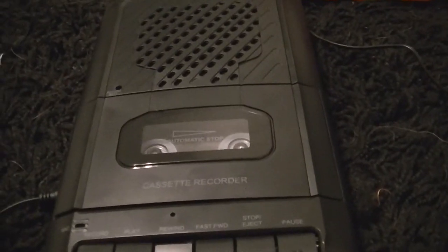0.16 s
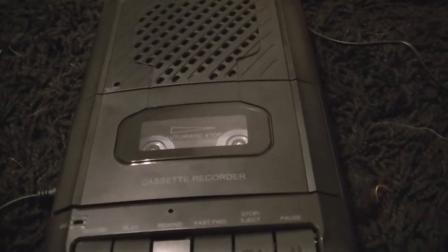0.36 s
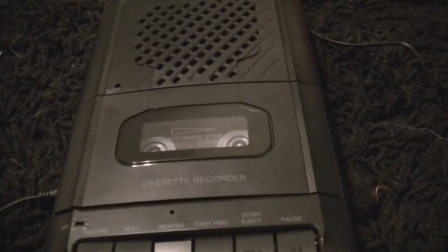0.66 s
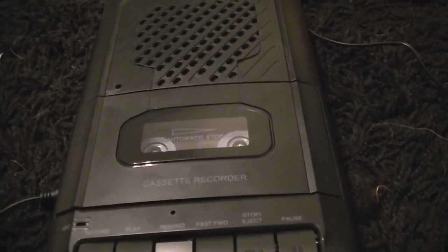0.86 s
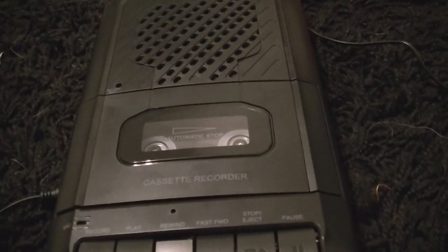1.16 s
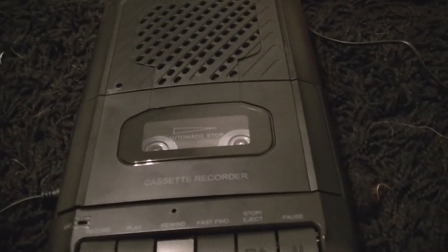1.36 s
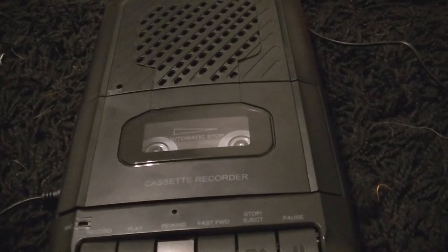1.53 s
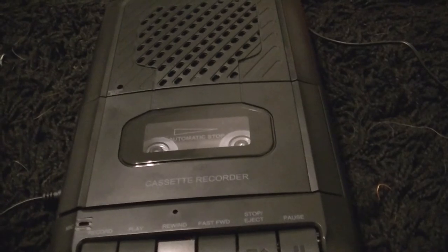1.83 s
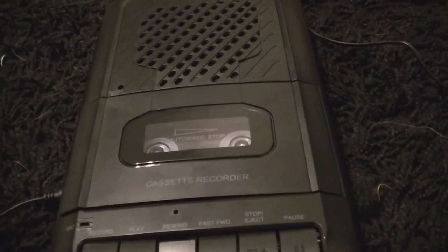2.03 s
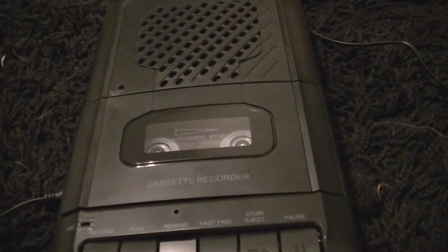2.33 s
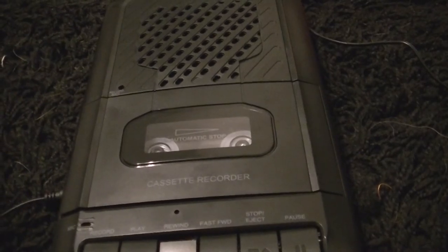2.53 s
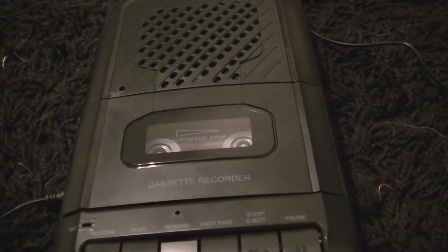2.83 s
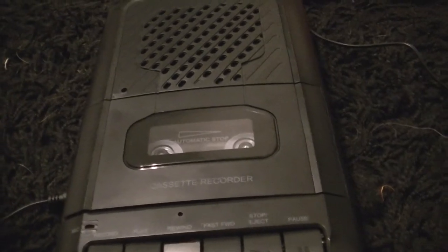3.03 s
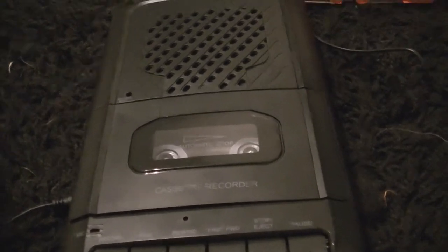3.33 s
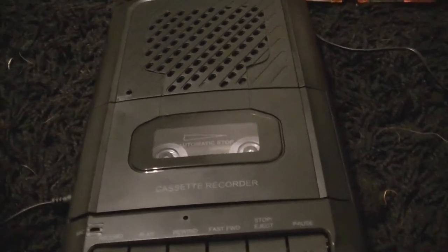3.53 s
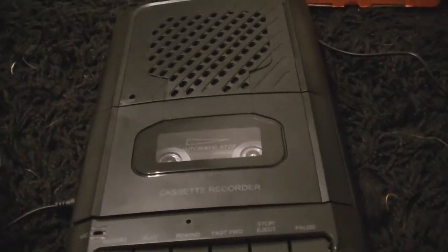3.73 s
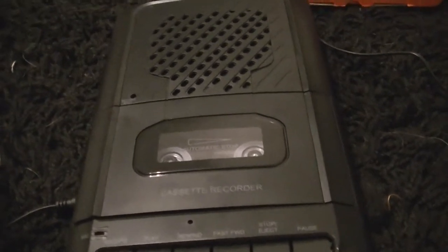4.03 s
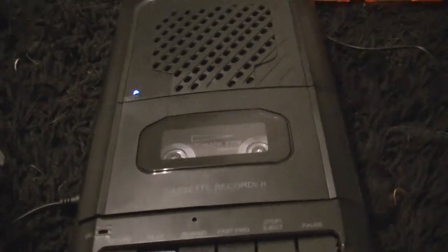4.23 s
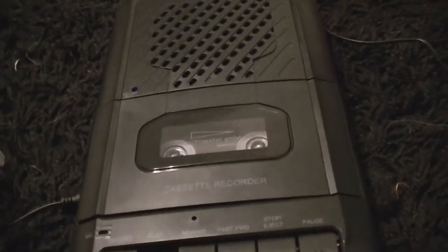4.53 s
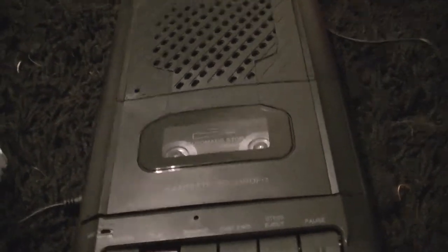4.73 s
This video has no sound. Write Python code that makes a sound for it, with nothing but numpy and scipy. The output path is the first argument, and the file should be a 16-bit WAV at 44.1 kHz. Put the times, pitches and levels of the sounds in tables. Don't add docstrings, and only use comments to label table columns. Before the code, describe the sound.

Tape rewinding inside a hollow plastic case, heard very near: fluttering mechanical chatter, midrange whirr, bright loose rattles, no bass. The tape runs out and the motor stalls, straining faintly. The rewind key springs back with one sharp metallic spike and short buzz, then fingers slide and click other keys, ending in slow motor hiss and thin whistle. Soft room air, short echoes.

```python
import sys
import numpy as np
from scipy import signal
from scipy.fft import rfft, irfft, next_fast_len
from scipy.io import wavfile

SR = 44100
rng = np.random.default_rng(int(sys.argv[2]) if len(sys.argv) > 2 else 0)


def wav_out(sig):
    wavfile.write(sys.argv[1], SR, np.round(np.clip(np.atleast_2d(sig).T, -1, 1) * 32767).astype(np.int16))


def how_loud(loudness_db):
    steps = np.asarray(loudness_db, float) / 20
    return 10 ** steps


N = 215230
TIME_S = np.arange(N) / SR

# pitch_hz, level_db (per Hz)
AIR_COLOUR = [(15, -81.5), (25, -44), (150, -16), (167, -10.5), (245, -7.5), (280, -2.5), (378, -2),
              (669, -6), (854, -1), (1280, -8.5), (1730, -4.5), (3700, -14), (15200, -30), (16500, -51.5)]
AIR_DB = -61
HUM_HZ, HUM_DB = 180.7, -82.5
# start_s, peak_db
HAND_BUMPS = [
    (0.131, -55),
    (0.177, -56),
]
JOLT_DB = -56
# pitch_hz, t60_s
ROOM_DECAY = [(500, 0.38), (2000, 0.39), (6000, 0.2), (14000, 0.054)]
ROOM_DB = -20
# pitch_hz, side_minus_mid_db
SIDE_COLOUR = [(60, -9), (200, -22), (380, -22.5), (700, -23.5), (1290, -36.5), (2380, -28), (4400, -20.5),
               (8120, -28.5), (15000, -24)]
KEYS_SIDE_DB = 1.5
STEADY_TOP_HZ = 15750

# time_s, level_db
STRAIN_LEVEL = [(2.8, -68.5), (3.14, -64)]
# time_s, level_db
PLAY_HISS_LEVEL = [(4.3, -80), (4.45, -68), (4.79, -66), (4.82, -68), (4.88, -70)]
# pitch_hz, width_hz, level_db
STRAIN_MODES = [(1100, 570, 0), (3100, 950, -0.5), (9900, 350, -13), (13500, 400, -14.5)]
# pitch_hz, width_hz, level_db
PLAY_MODES = [(1000, 1000, 1), (3675, 280, 7.5), (6610, 1050, -2.5), (7470, 160, -18.5)]
# time_s, level_db, pitch_hz
PLAY_WHISTLE = [(4.28, -80, 9900), (4.33, -74.5, 9800), (4.46, -68, 10400), (4.78, -68, 10250),
                (4.81, -61.5, 10100), (4.88, -66, 10100)]
LEADER_DB, LEADER_DB_PER_S, LEADER_HZ = -59, 5, 8500

# start_s, dull_snap_db, bright_snap_db, case_thump_db, ring_t60_s
SNAP_KEYS = [
    (2.7669, -31, -38.5, -41.5, 0.044),
    (2.7927, -44, -55, -49, 0.038),
    (3.3791, -40.5, -43, -57, 0.031),
    (3.5872, -59, -79, -68, 0.021),
    (4.155, -47, -52, -57, 0.013),
    (4.2071, -40.5, -47.5, -62, 0.023),
    (4.31, -50, -61, -59, 0.0235),
    (4.415, -28.5, -31.5, -43.5, 0.032),
    (4.799, -68, -80, -43, 0.012),
]
LATCH_SNAPS = [
    (3.198, -25, -25, -48.5, 0.044),
    (3.2048, -20.5, -16.5, -28.5, 0.026),
]
SPRING_BUZZES = [
    (3.158, -32, -38.5, -45, 0.2),
    (3.212, -42, -50, -52.5, 0.074),
]
# start_s, dull_snap_db, bright_snap_db, case_thump_db, scrape_in_s
SLIDE_KEYS = [
    (3.057, -58, -56, -55.5, 0.0099),
    (3.374, -55, -43.5, -66, 0.0032),
    (4.135, -60.5, -82.5, -60, 0.0026),
    (4.242, -46, -75, -54, 0.00275),
    (4.2484, -34.5, -41.5, -41, 0.0053),
    (4.405, -69.5, -52.5, -42, 0.0095),
    (4.79, -62.5, -55.5, -53.5, 0.005),
]
FINGER_RUBS = [
    (3.932, -64, -68, -56, 0.0046),
    (4.19, -51, -59, -55, 0.0051),
]
REWIND_KEY_SLIPS = [
    (3.115, -54, -66, -55, .002),
    (3.133, -50, -58, -49, .001),
    (3.1457, -28, -30, -40, .0006),
    (3.1497, -20, -20, -32, .0005),
]
# pitch_hz, level_db (per Hz)
SNAP_COLOUR = [(880, -48), (1500, -4), (2340, -6), (3050, -4), (3510, -4.5), (3880, -3.5), (4470, -4.5),
               (9170, -7.5), (15200, -17.5), (16800, -45.5)]
# pitch_hz, width_hz, level_db
CASE_MODES = [(546.5, 70, -4), (735, 96, 2.5), (930, 46, 2.5), (1011, 110, -0.5), (1233, 80, -2.5),
              (1420, 51, -2), (1280, 400, -7.5), (1980, 130, -7)]
SNAP_RISE_S, LATCH_RISE_S, SPRING_RISE_S = 0.0016, 0.0019, 0.01
SLIDE_T60_S, RUB_T60_S, SLIP_T60_S = 0.025, 0.18, 0.035
SPIKE_S, SPIKE_DB = 3.1488, -4
PAWL_S, PAWL_DB = 4.4712, -39

# time_s, turns_done
SHAFT_TURNS = [(0, .49), (.8, 34.33), (1.2, 51.32), (2, 85.4), (2.4, 102.58), (2.8, 120.1)]
# place_turns, level_db, scatter_db, slack_share (how much it follows HUB_SLACK)
SHAFT_CONTACTS = [
    (0, 6.5, 2.5, -0.076),
    (.3, -0.5, 7, 0.92),
    (.62, -15, 2.5, -0.026),
]
WHEEL_BEATS = [(.381, -.04), (.382, -.12), (.208, -.05)]
WHEEL_SWING_DB = [0.2, 4, 4.5]
# time_s, slack_db
HUB_SLACK = [(0, -16), (.5, -6), (.8, 2), (1.4, -1), (2, 5), (2.4, 3), (2.76, 1.5)]
TAPE_END_S, COAST_T60_S = 2.768, 0.14
# pitch_hz, width_hz, level_db
CHASSIS_MODES = [(2004, 740, -16), (3226, 400, -17), (3633, 150, -3), (3930, 390, -13), (4620, 360, -13),
                 (5196, 340, -11.5), (6250, 450, -12.5), (6910, 580, -13.5), (7470, 520, -14.5),
                 (9340, 1770, -16), (10600, 1800, -17.5), (11990, 1200, -25), (13600, 2000, -28),
                 (15900, 1000, -28)]
# start_s, peak_db
HUB_RATTLES = [(0.603, -30), (0.65, -37), (0.6816, -26), (0.7453, -50), (0.8697, -37), (1.0127, -33),
               (1.058, -30.5), (1.1294, -30), (1.171, -39), (1.215, -30), (1.292, -29), (1.4325, -33),
               (1.4814, -30), (1.5984, -25), (1.6225, -28.5), (1.6694, -38), (1.715, -25.5), (1.8562, -34),
               (1.8794, -30.5), (1.9272, -30.5), (1.95, -27.5), (1.973, -29), (1.997, -30.5),
               (2.044, -27.5), (2.068, -30.5), (2.1833, -27.5), (2.393, -27), (2.415, -35), (2.6126, -32),
               (2.686, -34.5)]
# pitch_hz, level_db (per Hz)
RATTLE_COLOUR = [(3000, -40), (4600, 0), (5300, -5.5), (7400, -10), (8250, -11), (9400, 0), (11200, -10.5),
                 (11900, -12), (15500, -25), (16500, -7.5)]
# start_s, peak_db, pitch_hz
FLANGE_TICKS = [(0.027, -32, 6180), (0.1216, -36, 5100), (0.145, -29, 5370), (0.2636, -26, 6400),
                (0.349, -28, 5240), (0.7806, -23, 5260), (1.039, -27, 5320), (1.18, -27, 5240),
                (1.3443, -24.5, 5160), (1.6432, -25, 5280), (1.8332, -22.5, 6160), (1.9515, -25, 6250),
                (1.9739, -45, 6340), (2.0921, -26, 5260), (2.2064, -24, 6840), (2.255, -22.5, 6230),
                (2.3705, -31, 6230)]
FLANGE_HZ = [5420, 6250, 6900]
# pitch_hz, width_hz, level_db
GEAR_MODES = [(607, 39, -14), (967.6, 50, -9), (1004.6, 48, -9.5), (1232, 120, -12.5), (1802, 17, -10.5),
              (2010, 390, -28.5), (3488, 630, -19.5)]
# pitch_hz, level_db (per Hz)
WHIRR_COLOUR = [(240, -58), (400, -21), (986, 5), (2890, -10.5), (3590, 5), (4190, -38), (5300, 10.5),
                (11200, -35), (15300, -32.5), (16500, -39.5)]
KNOCK_DB, WHIRR_DB, MESH_TEETH = -49.5, -56.5, 23
RUB_DB, RUB_RISE_FROM_S, RUB_RISE_DB_PER_S = -13, 1.9, 7
RATTLE_TREBLE_DB, TREBLE_FOLLOWS = -44, 0.52
LIGHT_RATTLE_DB, LIGHT_SCATTER_DB = -45.5, 5
TICK_DB, TICK_SCATTER_DB, TICK_TREBLE_DB = -40, 6, -9.5


def noise():
    return rng.standard_normal(N)


def rms_one(x):
    return x / np.sqrt(np.mean(x ** 2) + 1e-20)


def butter(x, order, hz, kind="low"):
    return signal.sosfilt(signal.butter(order, hz, kind, fs=SR, output="sos"), x)


def in_time(rows, outside=None):
    s, *columns = np.transpose(rows)
    return [np.interp(TIME_S, s, column, outside, outside) for column in columns]


def shade(x, spectrum):
    size = 4096
    hz, db = np.transpose(spectrum)
    bins_hz = np.arange(size // 2 + 1) * SR / size
    curve_db = np.interp(np.log(bins_hz + 1), np.log(hz), db)
    cepstrum = irfft(np.log(how_loud(curve_db)))
    cepstrum[1:size // 2] *= 2
    cepstrum[size // 2 + 1:] = 0
    response = irfft(np.exp(rfft(cepstrum)))
    return signal.fftconvolve(x, response)[:len(x)]


def resonate(x, peaks):
    out = 0
    for k, (hz, width_hz, db) in enumerate(peaks):
        r = np.exp(-np.pi * width_hz / SR)
        top = [(1 - r * r) / 2, 0, (r * r - 1) / 2]
        bottom = [1, -2 * r * np.cos(2 * np.pi * hz / SR), r * r]
        out = out + (-1) ** k * how_loud(db) * signal.lfilter(top, bottom, x + 1e-18)
    return out


def humps(peaks):
    hz = np.geomspace(200, 20000, 900)
    power = sum(how_loud(2 * db) / (1 + (2 * (hz - f) / width_hz) ** 2) ** 2 for f, width_hz, db in peaks)
    return np.transpose([hz, 10 * np.log10(power)])


def swells(times, dbs, t60s, rises):
    shape, t = np.zeros(N), np.arange(8000) / SR
    for s, db, t60, rise in np.broadcast(times, dbs, t60s, rises):
        start, rise = round(s * SR), max(rise, 1e-4)
        fall = how_loud(db - 60 * np.maximum(t - rise, 0) / max(t60, .003))
        one = fall * np.sin(np.pi / 2 * np.minimum(t / rise, 1)) ** 2
        shape[start:start + len(t)] += one[:N - start]
    return shape


def bursts(times, dbs, t60s, rises):
    return swells(times, dbs, t60s, rises) * noise()


def flicker(rate_hz, depth_db):
    r = np.exp(-2 * np.pi * rate_hz / SR)
    slow = signal.lfilter([1], [1, -2 * r, r * r], rng.standard_normal(N + SR))[SR:]
    return how_loud(depth_db * rms_one(slow))


def tone(hz):
    return np.sin(2 * np.pi * np.cumsum(hz * np.ones(N)) / SR)


def room_air():
    return how_loud(AIR_DB) * rms_one(shade(noise(), AIR_COLOUR))


def microphone_body():
    s, db = np.transpose(HAND_BUMPS)
    hits = bursts(s, db + 27, 0.017, 0.0032)
    bumps = resonate(resonate(hits, [(260, 160, 0)]), [(260, 210, 0)])
    jolt = swells(SPIKE_S, JOLT_DB, 0.0059, 0.0012)
    hum = how_loud(HUM_DB) * np.sqrt(2) * flicker(6.2, 2.9) * np.sin(2 * np.pi * HUM_HZ * TIME_S)
    return bumps + jolt + hum


def room(x):
    t, tail = np.arange(SR // 2) / SR, 0
    for hz, t60 in ROOM_DECAY:
        band = resonate(rng.standard_normal(len(t)), [(hz, 1.5 * hz, 0)])
        tail = tail + band * how_loud(-60 * t / t60) * np.minimum(t / 0.03, 1)
    return signal.fftconvolve(x, tail / np.sqrt(np.sum(tail ** 2)))[:N]


def slow_motor(curve, peaks, lift_db):
    level_db = in_time(curve, outside=-140)[0]
    return how_loud(level_db + lift_db) * flicker(30, 0.55) * rms_one(resonate(noise(), peaks))


def capstan():
    rough = rms_one(butter(noise(), 2, 260)) * flicker(15, 0.92)
    level_db = in_time(PLAY_WHISTLE, outside=-140)[0]
    pitch_hz = in_time(PLAY_WHISTLE)[1]
    return how_loud(level_db + 0.5) * rough * tone(pitch_hz)


def coasting():
    return how_loud(-60 * np.maximum(TIME_S - TAPE_END_S, 0) / COAST_T60_S)


def leader():
    growth_db = LEADER_DB_PER_S * np.minimum(TIME_S - TAPE_END_S, 0)
    hiss = butter(noise(), 2, LEADER_HZ, "high")
    return how_loud(LEADER_DB + growth_db) * coasting() * flicker(40, 2.1) * hiss


def strike(s, dull_db, bright_db, thump_db, t60, rise, top_hz):
    dull = butter(shade(bursts(s, dull_db + 9.5, t60, rise), SNAP_COLOUR), 3, 4800)
    bright = shade(bursts(s, bright_db + 14.0, 0.68 * t60, rise), SNAP_COLOUR)
    bright = butter(bright, 2, [4800, top_hz], "band")
    push = bursts(s, thump_db + 18.5, 1.74 * t60, rise)
    knock = np.gradient(swells(s + rise / 2, thump_db + 42, 0.0039, 0.00016))
    return dull + bright + resonate(push + knock, CASE_MODES)


def latch_spike():
    ring = .2 * tone(2900) + .8 * tone(6000) + tone(8800) + .8 * tone(10100) + .3 * tone(13800)
    return swells(SPIKE_S, SPIKE_DB, .0015, .0008) * ring


def pawl():
    return swells(PAWL_S, PAWL_DB, 0.0053, 0.00045) * (tone(1900) + tone(3000))


def keys():
    out = latch_spike() + pawl()
    snapping = [(SNAP_KEYS, SNAP_RISE_S, 12500), (LATCH_SNAPS, LATCH_RISE_S, 15900),
                (SPRING_BUZZES, SPRING_RISE_S, 9500)]
    for rows, rise, top_hz in snapping:
        out += strike(*np.transpose(rows), rise, top_hz)
    sliding = [(SLIDE_KEYS, SLIDE_T60_S, 12500), (FINGER_RUBS, RUB_T60_S, 12500),
               (REWIND_KEY_SLIPS, SLIP_T60_S, 15900)]
    for rows, t60, top_hz in sliding:
        s, dull_db, bright_db, thump_db, rise = np.transpose(rows)
        out += strike(s, dull_db, bright_db, thump_db, t60, rise, top_hz)
    return out


def touches(index, scatter_db):
    shaft_s, turns = np.transpose(SHAFT_TURNS)
    place, _, _, follows = SHAFT_CONTACTS[index]
    ratio, phase = WHEEL_BEATS[index]
    turn = np.arange(1, 119)
    luck = np.clip(rng.standard_normal((118, 2)), -2.5, 1.3)
    times = np.interp(turn + place + .03 * luck[:, 0], turns, shaft_s)
    slack_db = follows * np.interp(times, *np.transpose(HUB_SLACK))
    beat_db = WHEEL_SWING_DB[index] * np.cos(2 * np.pi * (ratio * turn + phase))
    return times, slack_db + beat_db + scatter_db * luck[:, 1]


def hub_rattles():
    light_s, light_db = touches(index=1, scatter_db=LIGHT_SCATTER_DB)
    s, db = np.transpose(HUB_RATTLES)
    plate = swells(s - .0015, db - 4.5, 0.011, 0.006)
    plate += swells(light_s - .002, LIGHT_RATTLE_DB + light_db, 0.0079, 0.00291)
    ring = plate * tone(3630 * flicker(60.6, 0.11))
    treble_db = RATTLE_TREBLE_DB + TREBLE_FOLLOWS * (db + 35.5) + 8
    return ring + shade(bursts(s - .0018, treble_db, 0.024, 0.0029), RATTLE_COLOUR)


def flange_ticks():
    light_s, light_db = touches(index=2, scatter_db=TICK_SCATTER_DB)
    light_hz = rng.choice(FLANGE_HZ, len(light_s))
    rows = np.vstack([FLANGE_TICKS, np.transpose([light_s, TICK_DB + light_db, light_hz])])
    s, db, hz = rows[np.argsort(rows[:, 0])].T
    latest = np.maximum(np.searchsorted(s - .002, TIME_S) - 1, 0)
    ticks = swells(s - .001, db - 15, 0.032, 0.0015) * tone(hz[latest] * flicker(186.5, 0.23))
    glint = bursts(s - .001, db + TICK_TREBLE_DB + 6.5, 0.013, 0.0028)
    return ticks + resonate(glint, [(9630, 430, -1.5), (11080, 410, -1.7)])


def gear_whirr():
    white = noise()
    rubbing = rms_one(shade(white, WHIRR_COLOUR)) * how_loud(-1.0)
    ringing = rms_one(resonate(white, GEAR_MODES)) * how_loud(2.0) * flicker(44, 1.0)
    turns_per_s = np.gradient(in_time(SHAFT_TURNS)[0]) * SR
    mesh_hz = MESH_TEETH * 1.008 * turns_per_s * flicker(20, .15)
    mesh = how_loud(-11) * flicker(35, 2.5) * tone(mesh_hz)
    return how_loud(WHIRR_DB) * coasting() * (rubbing + ringing + mesh)


def contacts(peaks):
    rub_db = RUB_DB + RUB_RISE_DB_PER_S * np.maximum(TIME_S - RUB_RISE_FROM_S, 0)
    scrapes = how_loud(rub_db) * noise() * flicker(40, 6.0) * coasting()
    for k, (_, db, scatter_db, _) in enumerate(SHAFT_CONTACTS):
        times, dbs = touches(k, scatter_db)
        scrapes += bursts(times - .0025, db + dbs, .011, .0045)
    return shade(scrapes, humps(peaks))


def motor():
    parts = CHASSIS_MODES[:4], CHASSIS_MODES[4:9], CHASSIS_MODES[9:]
    knocks = rms_one(sum(contacts(part) for part in parts))
    return how_loud(KNOCK_DB) * knocks + gear_whirr() + hub_rattles() + flange_ticks()


def scene():
    top = signal.cheby2(14, 40, STEADY_TOP_HZ + 250, fs=SR, output="sos")
    mid_air = signal.sosfilt(top, room_air())
    side_air = signal.sosfilt(top, room_air())
    running = motor() + capstan() + leader()
    running += slow_motor(STRAIN_LEVEL, STRAIN_MODES, lift_db=4)
    running += slow_motor(PLAY_HISS_LEVEL, PLAY_MODES, lift_db=6.0)
    running = butter(signal.sosfilt(top, running), 6, 490, "high")
    clicks = butter(keys(), 6, 490, "high")
    deck = running + clicks
    mid = deck + how_loud(ROOM_DB) * room(deck) + microphone_body() + mid_air
    uneven = how_loud(-3.0) * running + how_loud(KEYS_SIDE_DB) * clicks
    lagged = signal.hilbert(uneven, next_fast_len(N)).imag[:N]
    side = shade(lagged + how_loud(-34.5) * room(deck) + how_loud(5.0) * side_air, SIDE_COLOUR)
    return np.array([mid + side, mid - side])


def band_limit(x):
    return signal.sosfilt(signal.butter(12, 16980, fs=SR, output="sos"), x)


def record(dry):
    rounded = 1.3 * np.tanh(dry / 1.3)
    top = signal.cheby2(12, 60, 17350, fs=SR, output="sos")
    return band_limit(signal.sosfilt(top, rounded))


dry = scene()
out = record(dry)
wav_out(out)
```